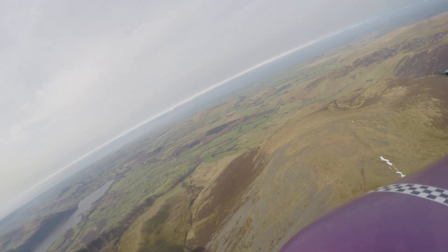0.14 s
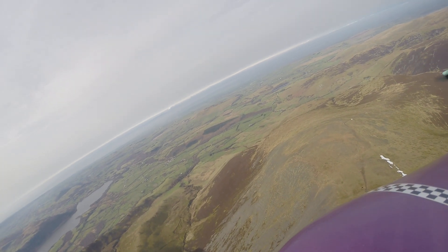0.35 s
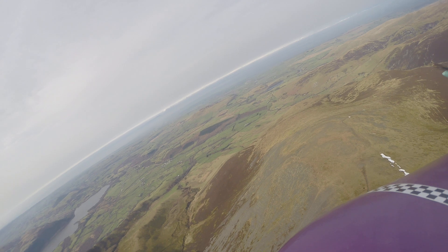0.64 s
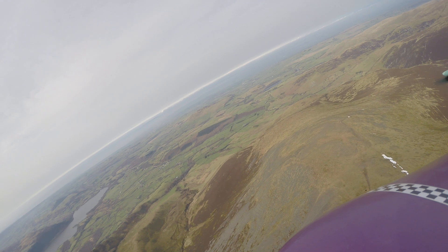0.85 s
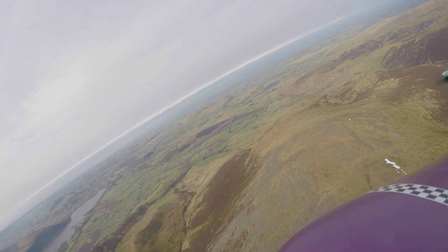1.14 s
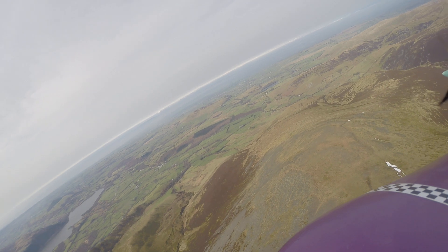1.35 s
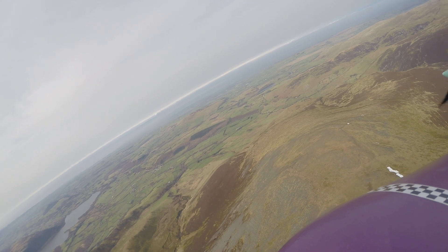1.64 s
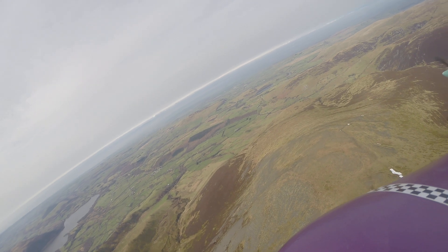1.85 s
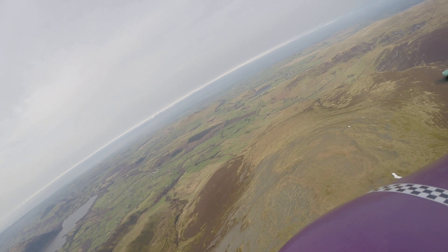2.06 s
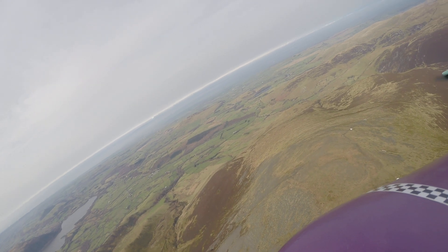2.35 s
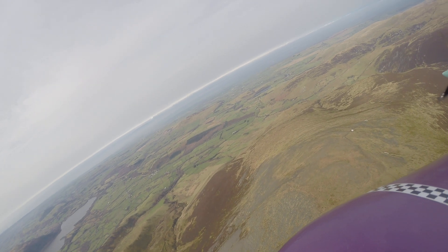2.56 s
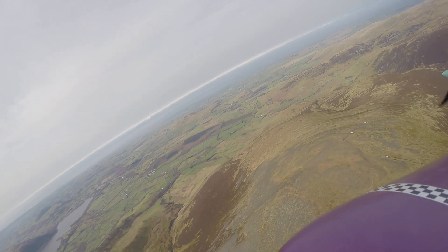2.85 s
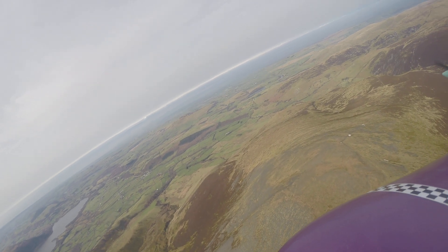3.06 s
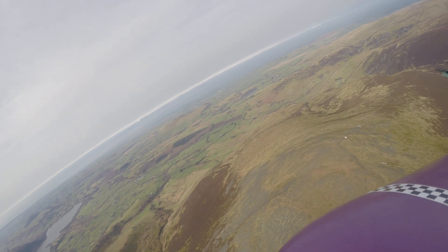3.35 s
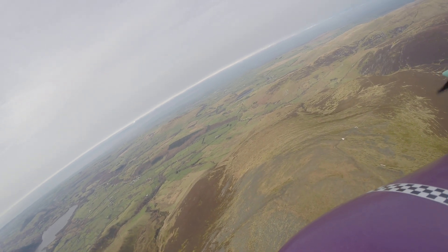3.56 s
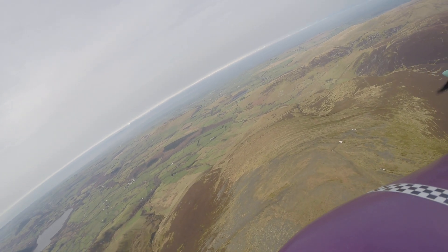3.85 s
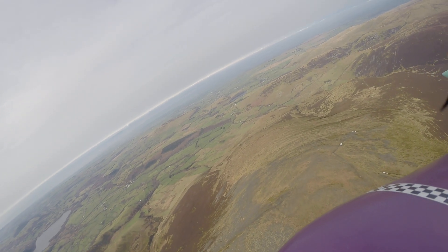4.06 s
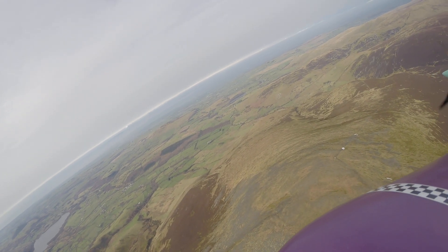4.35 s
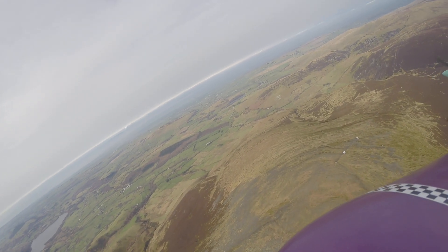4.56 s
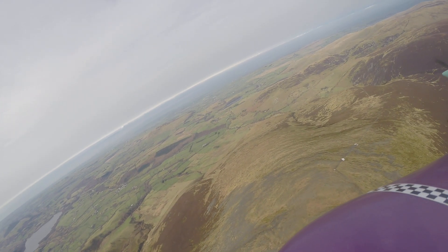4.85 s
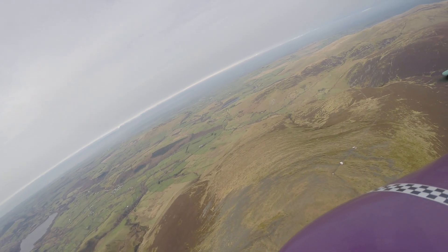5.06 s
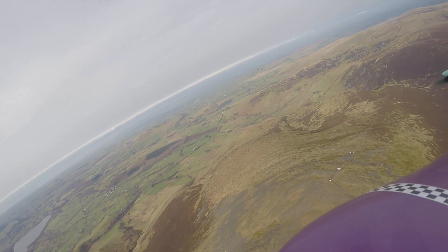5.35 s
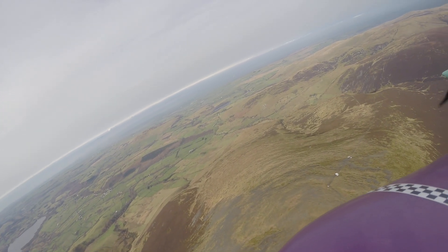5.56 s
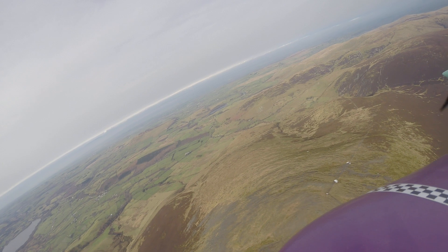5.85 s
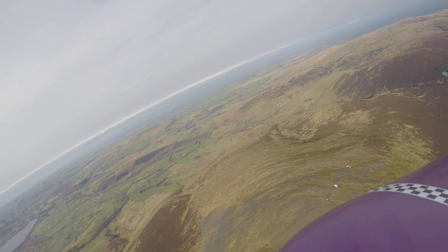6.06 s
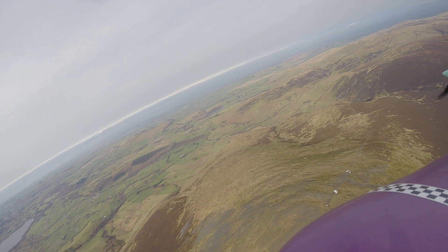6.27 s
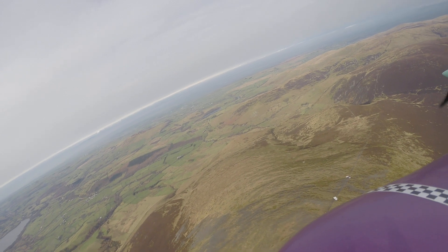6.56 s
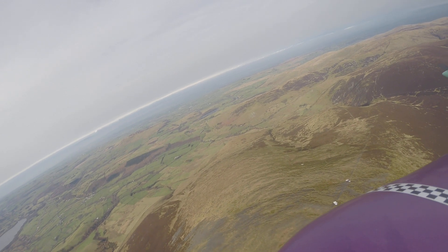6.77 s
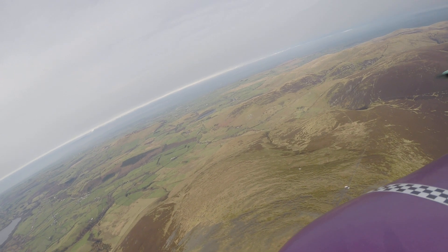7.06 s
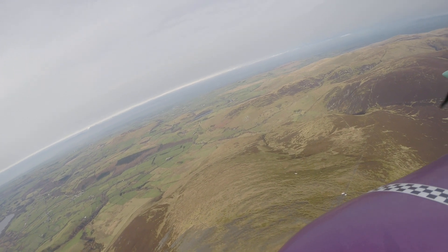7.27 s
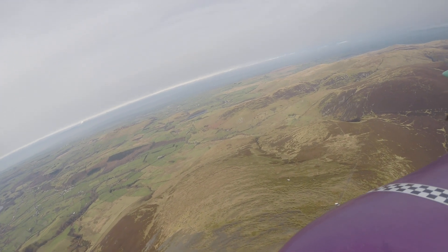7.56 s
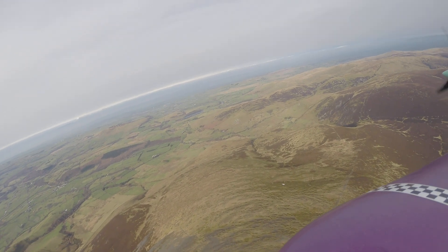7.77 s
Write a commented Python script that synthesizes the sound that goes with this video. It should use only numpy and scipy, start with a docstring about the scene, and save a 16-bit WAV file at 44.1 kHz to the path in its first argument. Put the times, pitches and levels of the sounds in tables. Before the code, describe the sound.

Mounted outside a small propeller aeroplane, the microphone catches a dense, bright rush of air that never lets up. Beneath it the piston engine and propeller hold a steady low drone, slightly throbbing and wavering. Turbulence adds low rumble and panel shudder. Everything is already running at the start and continues to the end, close and centred, with no echo.

```python
"""An engine drone under a broad rush of air: a small piston aeroplane cruising, heard from a camera
fixed outside on the airframe. Crankshaft and propeller drone through the mount as sines locked to the
shaft; turbulence shakes mount and panels as low resonant noise; the slipstream rushes over the camera
housing as hiss coloured by its resonances. One microphone feeds both channels."""
import sys
import numpy as np
from scipy import signal
from scipy.fft import rfft, irfft, next_fast_len
from scipy.io import wavfile

SR = 44100
rng = np.random.default_rng(int(sys.argv[2]) if len(sys.argv) > 2 else 0)


def transcribe(u):
    """Save the signal u as a 16-bit wav file named by the first command-line argument.

    u: samples, shape (n,) or (channels, n), limited to [-1, 1]; the rate is SR.
    q: integer samples, one column per channel.
    """
    v = np.clip(np.atleast_2d(u).T, -1, 1)
    q = np.round(v * 32767).astype(np.int16)
    wavfile.write(sys.argv[1], SR, q)


N = 349272
AIRFRAME_TOP_HZ = 540  # panel noise lies below, slipstream hiss above


def from_db(db):
    """Decibels to gain."""
    return 10 ** (np.asarray(db) / 20)


def in_time(rows):
    """Each column of a curve, joined by straight lines, at every sample."""
    s, *columns = np.transpose(rows)
    return [np.interp(np.arange(N) / SR, s, column) for column in columns]


def drift(corner_hz):
    """Slow chance with spread 1: coarse noise twice through a one-pole low-pass."""
    step = 40  # samples between coarse points
    settle = 2000  # coarse points dropped while the filter settles
    pole = np.exp(-2 * np.pi * corner_hz * step / SR)
    coarse = rng.standard_normal(N // step + 2 + settle)
    slow = signal.lfilter([1], [1, -2 * pole, pole * pole], coarse)[settle:]
    return np.interp(np.arange(N) / step, np.arange(len(slow)), slow / slow.std())


def swell(swing_db, corner_hz):
    """Gain that swells and sinks at random about one; the swing is its standard deviation in dB."""
    return from_db(swing_db * drift(corner_hz))


def turbulence(spectrum, modes, low_hz, high_hz):
    """Random pressure with a broad spectrum, lifted or notched by each resonance, kept between two edges."""
    size = next_fast_len(N)
    hz = np.maximum(np.arange(size // 2 + 1) * SR / size, 1)
    knots_hz, knots_db = np.transpose(spectrum)
    level_db = np.interp(np.log(hz), np.log(knots_hz), knots_db)
    for centre_hz, width_hz, peak_db in modes:
        level_db = level_db + peak_db / (1 + (2 * (hz - centre_hz) / width_hz) ** 2)
    low_edge = 1 + (low_hz / hz) ** 10
    high_edge = 1 + (hz / high_hz) ** 10
    edges = 1 / np.sqrt(low_edge * high_edge)
    white = rng.standard_normal(size) * np.sqrt(SR / 2)  # unit power per Hz
    return irfft(rfft(white) * from_db(level_db) * edges, size)[:N]


def engine(overtone_trim_db, waver_db, wander_rad, throb_rough_db, drone_rough_db):
    """Blade passes and firings give lines locked to the shaft; the weak ones waver in the moving air."""
    # speed of the shaft: time_s, speed_rpm
    shaft_speed = [(0.0, 3016), (0.2, 3028), (0.45, 3003), (1.4, 2971), (2.55, 2980), (3.1, 2967),
                   (4.2, 2984), (4.9, 2978), (5.85, 2971), (6.25, 2963), (6.7, 2965), (7.55, 2950),
                   (7.92, 2958)]
    # mean levels of the two strong orders: time_s, two_per_turn_throb_db, four_per_turn_drone_db
    strong_orders = [(0.0, -36.5, -30.8), (0.79, -34.0, -28.5), (1.78, -38.8, -29), (2.18, -33.5, -27.0),
                     (2.57, -35.5, -29.5), (3.56, -34.3, -28.5), (4.16, -30.9, -29), (5.54, -33.5, -28.8),
                     (5.94, -37.5, -30.5), (6.73, -35.1, -26.5), (7.52, -36, -30), (7.92, -37, -25.2)]
    # weaker orders, level ahead of the trim: multiple_of_shaft_speed, level_db
    weak_orders = [(1, -40), (2.5, -51), (3, -49), (5.5, -43), (6, -43), (7, -50.5), (8, -47.5), (9, -53.5),
                   (10, -54.5)]
    rpm, = in_time(shaft_speed)
    throb_db, drone_db = in_time(strong_orders)
    shaft_angle = 2 * np.pi * np.cumsum(rpm / 60) / SR

    def line(order, level_db, wander=0):
        """A sine at a multiple of the shaft speed, with that rms level."""
        phase = order * shaft_angle + rng.uniform(0, 2 * np.pi) + wander
        return np.sqrt(2) * from_db(level_db) * np.sin(phase)

    throb = line(2, throb_db) * swell(throb_rough_db, corner_hz=12)
    drone = line(4, drone_db) * swell(drone_rough_db, corner_hz=6)
    # the fifth order swells, fades and wanders in phase most of all
    warble = line(5, level_db=-35, wander=1.46 * drift(1.83)) * swell(4.0, corner_hz=2.5)
    sound = throb + drone + warble
    for order, level_db in weak_orders:
        weak_line = line(order, level_db + overtone_trim_db, wander_rad * drift(2.0))
        sound += weak_line * swell(waver_db, corner_hz=2.1)
    return sound


def airframe(panel_trim_db, mount_trim_db):
    """Eddies drum on the panels and rock the camera on its springy mount."""
    # turbulent push, ahead of resonances and trims: frequency_hz, density_db (in each Hz)
    push = [(12, -70), (22, -60), (45, -63), (60, -60.5), (130, -59.5), (210, -52), (280, -52.5),
            (370, -63.5), (550, -65)]
    # resonances of mount and panels: centre_hz, width_hz, peak_db
    airframe_modes = [(35, 16, 15), (92, 26, 6), (178.4, 12, 6.5), (247, 57, 4.5), (338.3, 8, 6),
                      (420, 15, 3)]
    mount_top_hz = 58
    panels = turbulence(push, airframe_modes, mount_top_hz, AIRFRAME_TOP_HZ)
    panels = panels * swell(0.76, corner_hz=5.0)  # buffets
    mount = turbulence(push, airframe_modes, 10, mount_top_hz)
    mount = mount * swell(1.6, corner_hz=3.0)  # shakes
    return from_db(panel_trim_db) * panels + from_db(mount_trim_db) * mount


def slipstream(trim_db, flutter_db, flutter_hz):
    """Fast air hisses in the housing's resonances; gusts and small eddies move all of it together."""
    # air rushing over the housing, ahead of resonances and trim: frequency_hz, density_db (in each Hz)
    rush = [(520, -65.5), (950, -65.0), (1150, -59.5), (2000, -53), (2900, -52.5), (4200, -59.5),
            (5200, -63.0), (6300, -59.5), (7200, -69), (8600, -74.3), (10300, -73.5), (11200, -81.5),
            (15000, -88)]
    # resonances (positive) and notches (negative) of the housing: centre_hz, width_hz, peak_db
    housing_modes = [(721, 117, 4.5), (1080, 67, 5.5), (1420, 224, 8), (1833, 50, -1.1), (2250, 75, 3.5),
                     (2350, 78, -3.5), (2540, 378, 8.5), (3264, 120, -2.5), (3463, 190, 6), (3700, 120, -1),
                     (4400, 174, -3), (4530, 95, 2.5), (4805, 167, -6.5), (5637, 726, 10),
                     (9600, 269, -2.6), (10050, 718, 3.5), (12390, 355, 5.4), (13471, 532, 6)]
    # slow rise and fall of the slipstream's strength, ahead of the trim: time_s, change_db
    airflow = [(0.0, 0.2), (0.26, -0.55), (1.32, 0.35), (1.58, -0.1), (2.38, 0.5), (2.64, -0.36),
               (3.7, 0.2), (3.96, -0.6), (4.22, 0.0), (4.75, 0.3), (5.02, -0.2), (7.92, 0.17)]
    airflow_db, = in_time(airflow)
    gusts = swell(0.3, corner_hz=4.0)
    small_eddies = swell(flutter_db, flutter_hz)
    hiss = turbulence(rush, housing_modes, AIRFRAME_TOP_HZ, SR / 2)
    return from_db(trim_db + airflow_db) * gusts * small_eddies * hiss


def scene():
    """All three reach one microphone on the airframe, so both channels are alike."""
    sound = engine(overtone_trim_db=-0.7, waver_db=2.0, wander_rad=0.53,
                   throb_rough_db=0.5, drone_rough_db=0.6)
    sound = sound + airframe(panel_trim_db=0.1, mount_trim_db=-0.4)
    sound = sound + slipstream(trim_db=-0.05, flutter_db=0.47, flutter_hz=42)
    return np.array([sound, sound])


def record(dry):
    """A steep elliptic low-pass cuts the top: 0.1 dB ripple below the cutoff, 90 dB down beyond it."""
    cutoff_hz = 15250
    low_pass = signal.ellip(14, 0.1, 90, cutoff_hz, fs=SR, output="sos")
    return signal.sosfilt(low_pass, dry)


dry = scene()
out = record(dry)
transcribe(out)
```